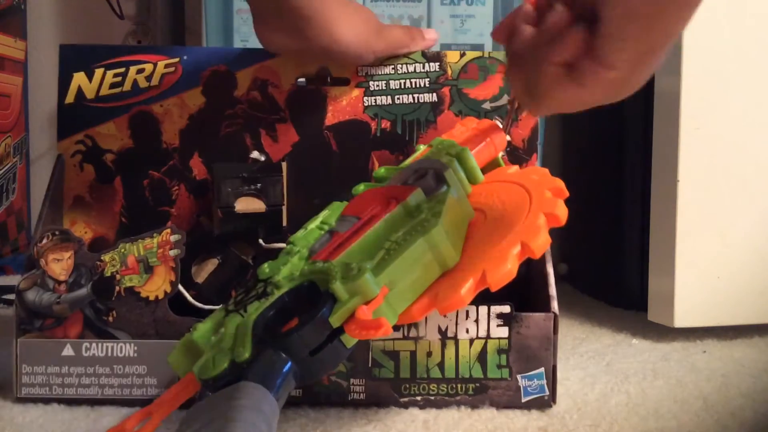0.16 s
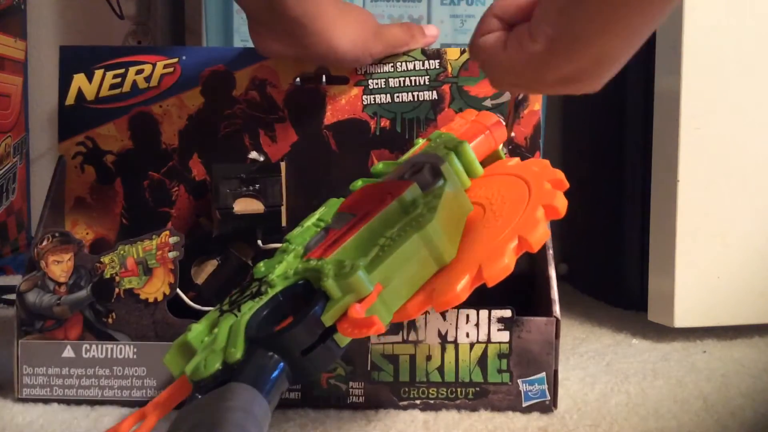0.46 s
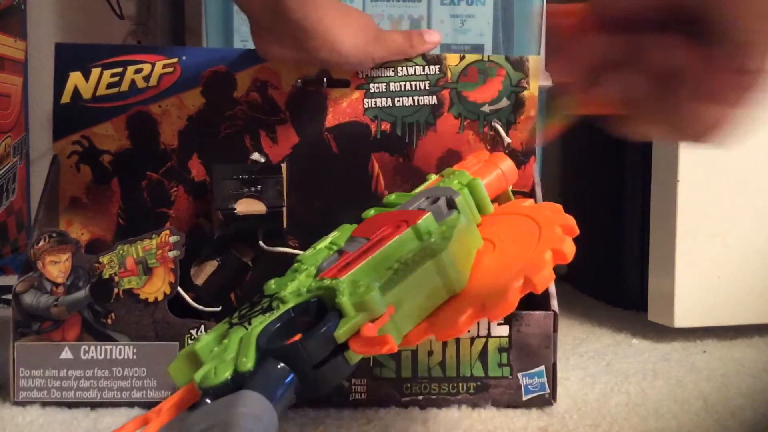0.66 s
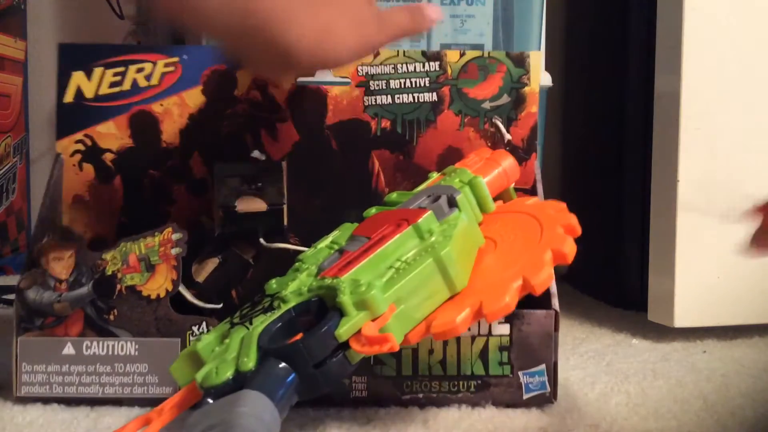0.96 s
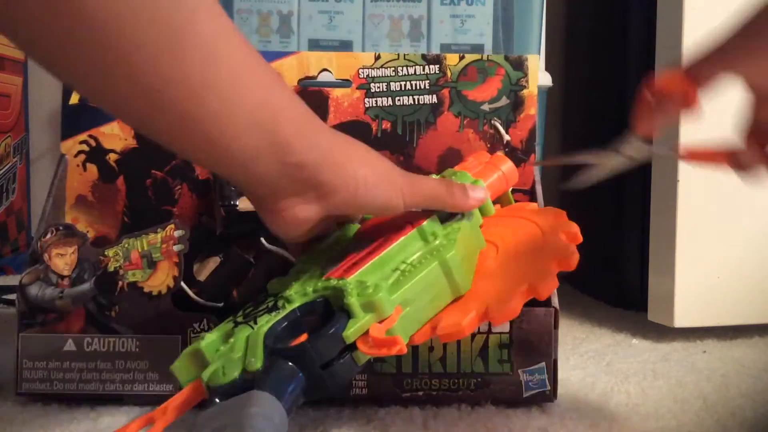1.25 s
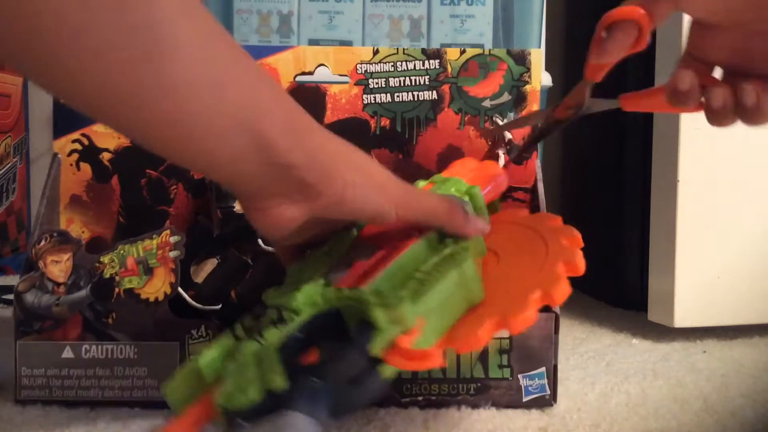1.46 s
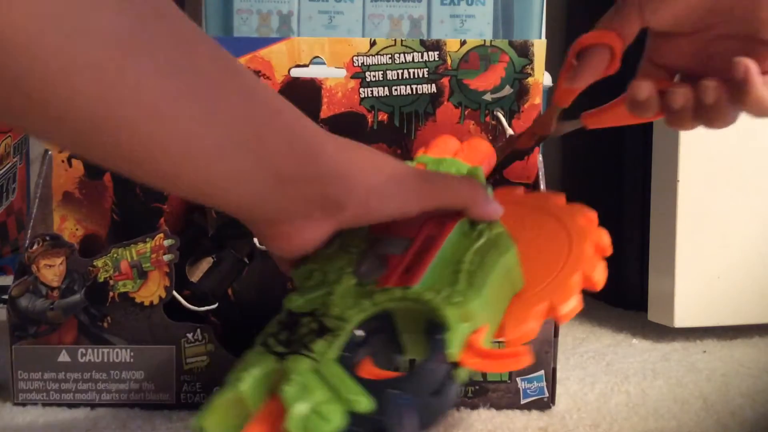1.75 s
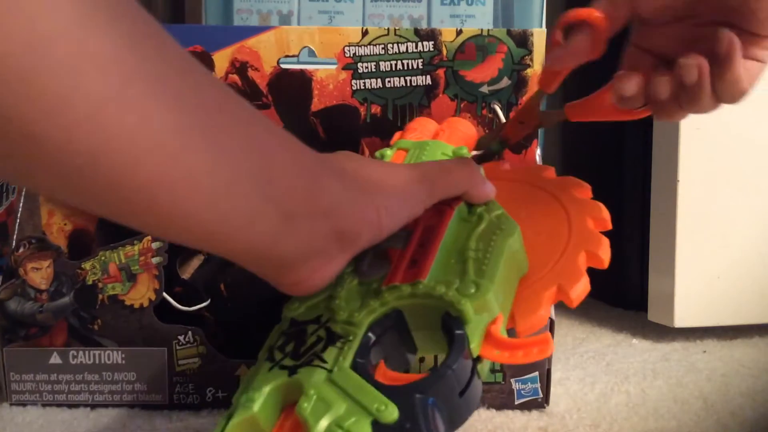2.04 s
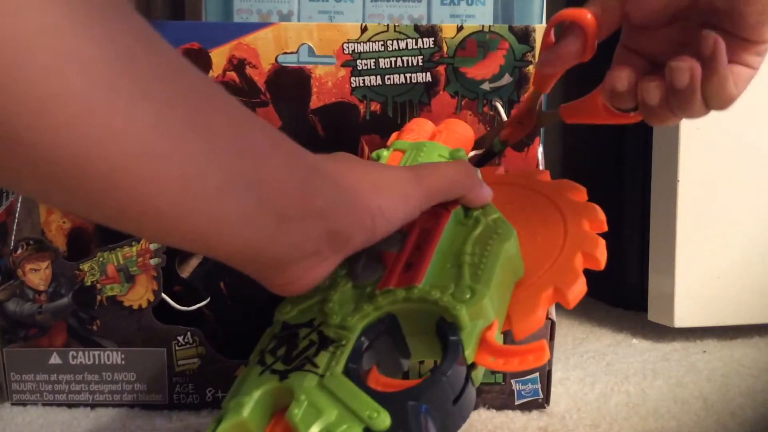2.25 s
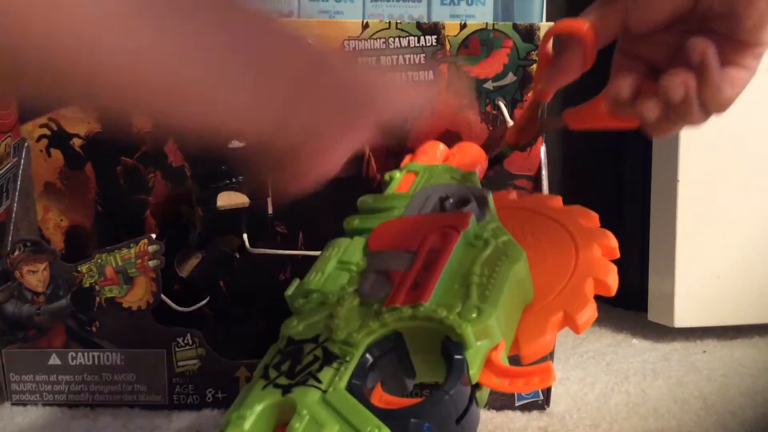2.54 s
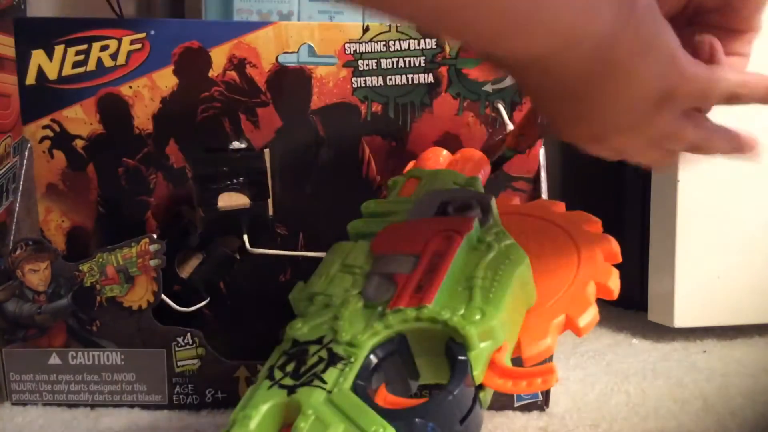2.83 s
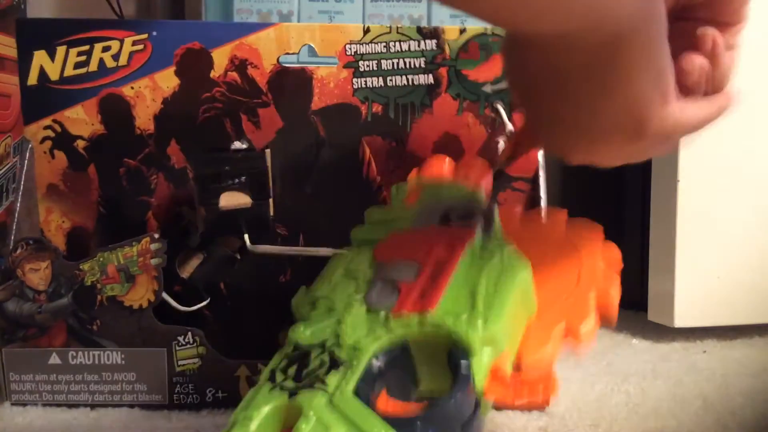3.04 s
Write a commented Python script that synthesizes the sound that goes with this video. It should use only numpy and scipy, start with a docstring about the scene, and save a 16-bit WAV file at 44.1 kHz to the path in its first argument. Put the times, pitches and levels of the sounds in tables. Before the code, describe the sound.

Scissors cut a plastic tie at about 3.1 s: a tiny sagging creak and crunch, a loud crisp snap with brief metallic ringing, then a hollow plastic-on-cardboard knock at 3.16 s. Earlier, faint taps lead to a clattering cluster around 0.6 s, smaller knocks and scrapes at 0.9-1.6 s, a bright tick near 1.24 s, then quiet rustling and faint ticks. Close, dry, small carpeted room with low air noise.

```python
"""Hollow knocks, scrapes and rustles: a plastic toy is shifted against its cardboard box in a small room.
Scissors tick and bite on a plastic tie, which creaks and parts with a sharp snap; the freed toy drops.
Knocks ring tuned modes with a noise rattle; ticks and bumps are coloured noise bursts; the snap adds
ringing modes; the creak is a sagging, jittery tone; scrapes are resonated clicks; hands are soft noise."""
import sys
import numpy as np
from scipy import signal
from scipy.fft import rfft, irfft
from scipy.io import wavfile

SR = 44100
rng = np.random.default_rng(int(sys.argv[2]) if len(sys.argv) > 2 else 0)


def output_pcm(signal):
    """Save a mono or channel-first signal as 16-bit PCM at the path in sys.argv[1].

    Samples are clipped to [-1, 1] before scaling.
    """
    pcm = np.clip(np.atleast_2d(signal).T, -1, 1) * 32767
    wavfile.write(sys.argv[1], SR, np.round(pcm).astype(np.int16))


N = 141120

# Blows of toy on box. Each row: time in seconds, box panel pitch in Hz, shell panel pitch in Hz,
# box thump, shell knock, clack and contact tick (attack levels in dB), ring length as a factor on every t60.
KNOCKS = [(.068,200,520,-60,-54.5,-60,-74,1.1), (.127,170,417,-57.5,-58,-68,-66,1.3),
          (.199,155,500,-56.5,-62,-74,-72,1), (.224,194,564,-55,-55,-65,-72,1.16),
          (.428,192,940,-59.5,-55,-76,-68,0.76), (.5775,190,922,-34.5,-26,-44,-44,1.12),
          (0.5836,215,880,-35.5,-34.5,-34,-48.5,0.8), (.594,300,676,-50,-35,-49,-67,0.98),
          (.6075,290,470,-39,-36.5,-45,-52,1), (.616,180,630,-43.5,-39,-42.5,-55,1),
          (.624,260,700,-51,-56,-41,-47,0.97), (.656,200,600,-64,-73,-56.5,-59,1),
          (.8845,238,640,-50,-45,-50.5,-57.5,0.77), (.915,218,647,-40,-40.5,-68,-55,0.92),
          (.929,286,600,-40.5,-43,-51.5,-51,0.92), (1.2582,280.5,703,-52,-41.5,-48,-58,0.97),
          (1.339,267,400,-36.5,-37.5,-42,-48.5,0.81), (1.349,220,396,-55,-41,-49,-69,.8),
          (1.4525,288,600,-44,-41.5,-47,-57,.8), (1.457,149,550,-41,-40.5,-71,-76,0.93),
          (1.606,220,1305,-57,-52.5,-58.5,-57,.8), (1.6334,190,520,-36,-40,-48,-56.5,1.2),
          (1.987,200,1450,-67.5,-62.5,-63,-67.5,0.71), (2.111,220,600,-54.5,-55,-66,-78,1.02),
          (2.499,220,1010,-73,-63,-62,-72,1), (2.552,220,790,-69,-61.5,-80,-98,0.89),
          (2.574,220,650,-60.5,-61,-69.5,-89,0.84), (2.637,219.5,944,-59.5,-58,-73,-81,0.93),
          (2.835,220,600,-63,-61.5,-70.5,-80.5,1.16), (3.159,215,763,-19,-22.5,-23.5,-27,0.68),
          (3.1673,280,1030,-31,-18.5,-32.5,-33.5,1.02), (3.185,330,1050,-53,-36,-40,-50,1)]
# Thump, knock, clack and tick registers. Each row: lower edge in Hz, upper edge in Hz.
REGISTERS_HZ = [(130, 380), (350, 1500), (1500, 5000), (5000, 16000)]
# Irregular rattle per register. Each row: level in dB against the modes, t60 in seconds at ring length 1.
RATTLE = [(-11, .07), (-1, .042), (1, 0.039), (4, 0.031)]
# Toy and box ringing together. Each row: centre pitch in Hz, mean level in dB, t60 in s at ring length 1.
BODY_MODES = [(170,-5.5,.055), (215,-4,.05), (268.8,0,.055), (347,1,.06), (500,1,0.039), (621,1.5,.045),
              (763,-4.5,0.037), (943,-0.5,0.032), (1020,-3,.045), (1250,-4,.045), (2307,-2.5,.04),
              (2958,-3,0.032), (4196,-1.5,0.033), (5510,-6,.04), (6540,-6,.025)]
MODE_SCATTER_DB, PITCH_SCATTER = 4, .025  # standard deviations from blow to blow; pitch as a fraction
THUMP_LEAD_S, CONTACT_RISE_S = .0019, .00094  # the thump register starts early; each blow fades in
PANEL_DB, BOX_PANEL_T60_S, SHELL_PANEL_T60_S = 1, .045, .035  # dB against the modes; t60 at ring length 1

# The tie parts: time in seconds and attack level in dB of its pop, then of the crack.
POP_S, POP_DB = 3.0824, -19.5
CRACK_S, CRACK_DB = 3.0843, -15.5
# Ringing of the parting tie. Each row: pitch in Hz, relative level in dB, t60 in seconds.
TIE_MODES = [(520,2,.04), (600,-3,0.037), (880,-13.5,0.033), (1255,-14.5,0.028), (1530,-12.5,.025),
             (1910,-7,0.039), (2265,-13,0.04), (2850,-7,0.029), (3460,-10.5,0.028), (4230,-11.5,0.034)]
# Ringing of the scissor blades. Each row: pitch in Hz, relative level in dB, t60 in seconds.
BLADE_MODES = [(4290,-18,.25), (5670,-25,.13), (7350,-1,.05), (7550,-2,.05), (8720,-5,0.091),
               (9265,-7,0.099), (9935,-9,.12), (10800,-12,0.23), (11000,-17,0.26), (11500,-21,.14),
               (14080,-17,.15)]
# Tone of the crack. Each row: frequency in Hz, gain in dB.
CRACK_COLOUR = [(500,-5.5), (2000,-9), (4200,-15), (6000,-10.5), (7500,-0.5), (10000,5.5), (12500,-6),
                (15500,-3)]
# Tone of the noisy shimmer after the crack. Each row: frequency in Hz, gain in dB.
SHIMMER_COLOUR = [(500,-9), (2200,1.5), (3200,-5), (4300,0), (5800,-7), (7500,-1), (10500,1.5), (12500,0),
                  (15500,-8)]
BLADE_DB, SHIMMER_DB = -12.5, -18  # against the crack
CRACK_T60_S, SHIMMER_T60_S, TIE_LOW_CUT_HZ = .0099, .27, 340

CREAK_S, CREAK_LENGTH_S, CREAK_DB = 3.033, .0363, -42.5
CREAK_HZ, CREAK_SAG_HZ_PER_S, CREAK_JITTER = 572, 4300, .3  # jitter is a fraction of the pitch
# Overtones of the squeak. Each row: multiple of the pitch, relative level in dB.
CREAK_PARTIALS = [(1,1), (2,-20), (3,-13), (4,-27)]
CREAK_RASP_HZ, CREAK_RASP_WIDTH_HZ, CREAK_RASP_DB = 3000, 140, -19  # dB against the squeak
BITE_S, BITE_LENGTH_S, BITE_DB, BITE_RISE_DB = 3.06, .023, -26, 30  # BITE_DB is reached at the end
# Tone of the crunch as the blades sink in. Each row: frequency in Hz, gain in dB.
BITE_COLOUR = [(300,-24), (560,12.5), (900,-4), (2000,-5.5), (4000,-1.5), (6000,-17), (8000,-3), (9500,-27),
               (15000,-24)]

# Scissors and tie ticking. Each row: time in seconds, attack level in dB, t60 in seconds.
TICKS = [(.899,-52,0.048), (1.224,-61,.03), (1.237,-46,0.033), (1.241,-37,0.025), (2.353,-67.5,0.049),
         (2.401,-64,.025), (2.453,-61.5,0.023), (2.485,-65,0.046), (2.658,-61,.03), (2.872,-72,.04),
         (3.061,-58,.012)]
# Tone of the ticks. Each row: frequency in Hz, gain in dB.
TICK_COLOUR = [(200,-20), (1200,-5.5), (2600,-3), (4200,-0.5), (6000,-1), (8000,-0.5), (10500,-9.5),
               (12400,-5.5), (13500,-15), (15500,-20)]
TICK_RISE_S = .0015

# Plastic sliding on card. Each row: start in seconds, length in seconds, level at mid-stroke in dB.
SCRAPES = [(.095,.03,-61), (0.552,.035,-43.5), (.582,.022,-37.5), (.611,.022,-39.5), (0.633,0.037,-57.5),
           (1.104,0.12,-67.5), (1.226,0.049,-50.5), (1.342,.03,-41), (1.368,.026,-50), (1.715,0.09,-64),
           (2.47,0.036,-71)]
# Resonances the slips excite. Each row: centre in Hz, width of each of two passes in Hz, level in dB.
SCRAPE_RESONANCES = [(454,500,-7.5), (1294,190,-6.5), (1800,410,-7.5), (4052,310,-1.5), (4290,320,-4),
                     (6400,1500,-12.5), (8800,5000,-10.5)]
SLIPS_PER_S, SLIP_SPREAD_DB = 2500, 2.5

# Box bumping on the carpet. Each row: time in seconds, attack level in dB.
BUMPS = [(.573,-49), (.606,-49.5), (.921,-57), (1.453,-50), (2.268,-53), (3.158,-32)]
# Tone of the bumps. Each row: frequency in Hz, gain in dB.
BUMP_COLOUR = [(20,-30), (50,-7), (85,0.5), (170,-3), (400,-30), (2000,-70)]
BUMP_T60_S = .065

# Low rumble of the hands moving the toy. Each row: time in seconds, level in dB.
RUMBLE_LEVEL = [(0,-72), (.14,-59.5), (.3,-65), (.54,-61), (.66,-67), (.8,-62.5), (.95,-65), (1.1,-67),
                (1.48,-56.5), (1.58,-63.5), (1.7,-61), (1.93,-57), (2.06,-68.5), (2.245,-67), (2.275,-56),
                (2.33,-60), (2.5,-66), (2.78,-67), (2.905,-55), (2.945,-45.5), (3.02,-55.5), (3.2,-44)]
# Tone of the rumble. Each row: frequency in Hz, gain in dB.
RUMBLE_COLOUR = [(25,-32), (60,-5), (90,0.5), (160,2.5), (300,-4), (450,-8.5), (800,-29), (2000,-54)]
# Rubbing of the hands on the toy. Each row: time in seconds, level in dB.
RUB_LEVEL = [(0,-64.5), (.1,-60), (.33,-65), (.52,-60.5), (.68,-63.5), (.8,-73), (.97,-64.5), (1.08,-69),
             (1.3,-61.5), (1.51,-62.5), (1.58,-64), (1.76,-58), (1.83,-65), (1.94,-60.5), (2.05,-76.5),
             (2.45,-71), (2.76,-81), (3.2,-71)]
# Tone of the rubbing. Each row: frequency in Hz, gain in dB.
RUB_COLOUR = [(150,-3.5), (500,4), (1000,-5), (1300,-6), (1800,-3.5), (2200,-9.5), (2650,-8.5),
              (3200,-15.5), (4200,-10), (5200,-17), (9000,-14.5), (15500,-22)]
GRAINS_PER_S, GRAIN_DB, GRAIN_SPREAD_DB = 250, -7, 4  # grain level against the smooth noise

# Tone of the still air. Each row: frequency in Hz, gain in dB.
AIR_COLOUR = [(15, -44), (25, -16.5), (69, 7), (204, -3), (359, -11.5), (482, -17.5), (567, -21),
              (895, -22.5), (2770, -29.5), (9050, -26.5), (15500, -24)]
AIR_DB = -70
# Tone of the room's tail. Each row: frequency in Hz, gain in dB.
ROOM_COLOUR = [(80,-2.5), (300,-3.5), (1000,-1.5), (4000,2.5), (10000,-1.5), (16000,-6)]
ROOM_T60_S, ROOM_DB, ROOM_DELAY_S = .2, -17, .005

LOW_CUT_HZ, CUTOFF_HZ = 35, 15200
ATTACK_S = .0075  # the opening stretch that sets a blow's level
RING_TIME = np.arange(SR // 6) / SR  # seconds; every struck sound ends with it


def knocks():
    """A blow rings two panels and the whole body, with a short rattle, weighted register by register."""
    out = np.zeros(N)
    bands = [signal.butter(2, edges, "band", fs=SR, output="sos") for edges in REGISTERS_HZ]
    contact = np.minimum(RING_TIME / CONTACT_RISE_S, 1)
    for s, box_hz, shell_hz, *levels_db, length in KNOCKS:
        body = [(hz, db, t60 * length) for hz, db, t60 in BODY_MODES]
        modes = ring(body, MODE_SCATTER_DB, PITCH_SCATTER)
        box = panel_tone(box_hz, BOX_PANEL_T60_S * length)
        shell = panel_tone(shell_hz, SHELL_PANEL_T60_S * length)
        panels = [box, shell, 0, 0]  # only the two lower registers hold a panel
        for k, (band, db, panel, (rattle_db, t60)) in enumerate(zip(bands, levels_db, panels, RATTLE)):
            tone = attack_one(signal.sosfilt(band, modes))
            rattle = attack_one(signal.sosfilt(band, burst(t60 * length)))
            blow = contact * (tone + from_db(PANEL_DB) * panel + from_db(rattle_db) * rattle)
            start = s - THUMP_LEAD_S * (k == 0)
            add(out, start, from_db(db) * attack_one(signal.sosfilt(band, blow)))
    return out


def panel_tone(hz, t60):
    """A flat panel's single decaying mode, starting at full swing."""
    return attack_one(np.cos(2 * np.pi * hz * RING_TIME) * dying(t60))


def snip():
    """The tie gives with a pop of struck modes; the blades clap shut with a noise crack and ring on."""
    out = np.zeros(N)
    low_cut = signal.butter(2, TIE_LOW_CUT_HZ, "high", fs=SR, output="sos")
    pop = signal.sosfilt(low_cut, ring(TIE_MODES))
    add(out, POP_S, from_db(POP_DB) * attack_one(pop))
    crack = attack_one(coloured(burst(CRACK_T60_S), CRACK_COLOUR))
    shimmer = attack_one(coloured(burst(SHIMMER_T60_S), SHIMMER_COLOUR))
    blades = attack_one(ring(BLADE_MODES))
    clap = crack + from_db(SHIMMER_DB) * shimmer + from_db(BLADE_DB) * blades
    add(out, CRACK_S, from_db(CRACK_DB) * clap)
    return out


def creak():
    """The tie squeaks under the blades, sinking in pitch, then crunches ever louder as they bite."""
    out, swell = np.zeros(N), arch(CREAK_LENGTH_S)
    jitter, grit, crunch = rng.standard_normal((3, SR // 4))
    sagging_hz = CREAK_HZ - CREAK_SAG_HZ_PER_S * np.arange(len(swell)) / SR
    hz = sagging_hz * (1 + CREAK_JITTER * jitter[:len(swell)])
    phase = 2 * np.pi * np.cumsum(hz) / SR
    squeak = rms_one(sum(from_db(db) * np.sin(round(k) * phase) for k, db in CREAK_PARTIALS))
    pulsed_grit = grit[:len(swell)] * (1 + np.cos(phase))  # noise that swells once a cycle
    rasp = resonate(pulsed_grit, CREAK_RASP_HZ, CREAK_RASP_WIDTH_HZ)
    add(out, CREAK_S, from_db(CREAK_DB) * swell * (squeak + from_db(CREAK_RASP_DB) * rasp))
    force = from_db(np.linspace(BITE_DB - BITE_RISE_DB, BITE_DB, int(BITE_LENGTH_S * SR)))
    add(out, BITE_S, force * rms_one(coloured(crunch[:len(force)], BITE_COLOUR)))
    return out


def scrapes():
    """Plastic sliding on card: dense uneven slips excite a few resonances."""
    grit = slips(SLIPS_PER_S, SLIP_SPREAD_DB)
    rasp = np.zeros(N)
    for hz, width, db in SCRAPE_RESONANCES:
        rasp += from_db(db) * resonate(resonate(grit, hz, width), hz, width)
    pressure = np.zeros(N)
    for s, length, db in SCRAPES:
        add(pressure, s, from_db(db) * arch(length))
    return rms_one(rasp) * pressure


def ticks():
    """Light, bright contacts of the scissors and the tie: short noise bursts with a softened start."""
    out = np.zeros(N)
    for s, db, t60 in TICKS:
        contact = burst(t60) * np.minimum(RING_TIME / TICK_RISE_S, 1)
        add(out, s, from_db(db) * attack_one(coloured(contact, TICK_COLOUR)))
    return out


def bumps():
    """Dull weight of the box settling on the carpet: dying noise with little treble."""
    out = np.zeros(N)
    for s, db in BUMPS:
        add(out, s, from_db(db) * attack_one(coloured(burst(BUMP_T60_S), BUMP_COLOUR)))
    return out


def handling(level, colour):
    """Soft, slightly grainy friction that follows the hands' movement."""
    grains = rms_one(slips(GRAINS_PER_S, GRAIN_SPREAD_DB))
    friction = rng.standard_normal(N) + from_db(GRAIN_DB) * grains
    movement = from_db(np.interp(np.arange(N) / SR, *np.transpose(level)))
    return movement * rms_one(coloured(friction, colour))


def still_air():
    """Steady coloured noise under everything."""
    return from_db(AIR_DB) * rms_one(coloured(rng.standard_normal(N), AIR_COLOUR))


def room(x):
    """Short diffuse tail of a carpeted room: convolution with dying noise."""
    tail, out = coloured(burst(ROOM_T60_S), ROOM_COLOUR), np.zeros(N)
    add(out, ROOM_DELAY_S, signal.fftconvolve(x, tail / np.linalg.norm(tail)))
    return from_db(ROOM_DB) * out


def slips(per_s, spread_db):
    """Random stick-slip clicks of either sign, mostly small with a few stronger."""
    happens = rng.random(N) < per_s / SR
    sign = rng.choice([-1, 1], N)
    return happens * sign * from_db(spread_db * np.minimum(rng.exponential(1, N), 4))


def ring(modes, scatter_db=0, detune=0):
    """Struck modes; strength and pitch can be scattered at random from blow to blow."""
    chance = rng.standard_normal((len(modes), 2))
    out = np.zeros(len(RING_TIME))
    for k, ((hz, db, t60), (a, b)) in enumerate(zip(modes, chance)):
        swing = np.sin(2 * np.pi * hz * (1 + detune * b) * RING_TIME)
        out += (-1) ** k * from_db(db + scatter_db * a) * dying(t60) * swing  # signs alternate
    return out


def burst(t60):
    """Noise that dies away."""
    return rng.standard_normal(len(RING_TIME)) * dying(t60)


def dying(t60):
    """Exponential decay, down 60 dB after t60 seconds."""
    return np.exp(-np.log(1000) * RING_TIME / t60)


def arch(length):
    """Swell and fade of one stroke."""
    return np.sqrt(np.abs(np.sin(np.linspace(0, np.pi, int(length * SR)))))


def resonate(x, hz, width):
    """One resonance, rms 1."""
    return rms_one(signal.lfilter(*signal.iirpeak(hz, hz / width, fs=SR), x + 1e-18))


def coloured(x, points):
    """Causal (minimum-phase) filter through (Hz, dB) points."""
    size = 4096
    hz, db = np.transpose(points)
    bins = np.maximum(np.arange(size // 2 + 1) * SR / size, 1)
    cepstrum = irfft(np.log(from_db(np.interp(np.log(bins), np.log(hz), db))))
    # folding the cepstrum onto positive time gives minimum phase
    cepstrum[1:size // 2] *= 2
    cepstrum[size // 2 + 1:] = 0
    return signal.oaconvolve(x, irfft(np.exp(rfft(cepstrum))))[:len(x)]


def from_db(db):
    """Decibels to gain."""
    return 10 ** (np.asarray(db) / 20)


def rms_one(x):
    """Scale to rms 1."""
    return x / np.sqrt(np.mean(x ** 2) + 1e-20)


def attack_one(x):
    """Scale a blow to rms 1 over its attack."""
    return x / np.sqrt(np.mean(x[:int(ATTACK_S * SR)] ** 2) + 1e-20)


def add(out, s, x):
    """Mix x in at time s, in seconds."""
    i = int(s * SR)
    out[i:i + len(x)] += x[:max(len(out) - i, 0)]


def scene():
    """Contacts with their room, over handling noise and still air."""
    contacts = knocks() + snip() + creak() + scrapes() + ticks() + bumps()
    hands = handling(RUMBLE_LEVEL, RUMBLE_COLOUR) + handling(RUB_LEVEL, RUB_COLOUR)
    return (contacts + room(contacts) + hands + still_air())[None]


def record(dry):
    """The microphone sheds the deep bass; the top is cut steeply."""
    thinned = signal.sosfilt(signal.butter(1, LOW_CUT_HZ, "high", fs=SR, output="sos"), dry)
    # .2 dB of ripple below the cutoff, 70 dB of rejection above
    return signal.sosfilt(signal.ellip(10, .2, 70, CUTOFF_HZ, fs=SR, output="sos"), thinned)


dry = scene()
out = record(dry)
output_pcm(out)
```